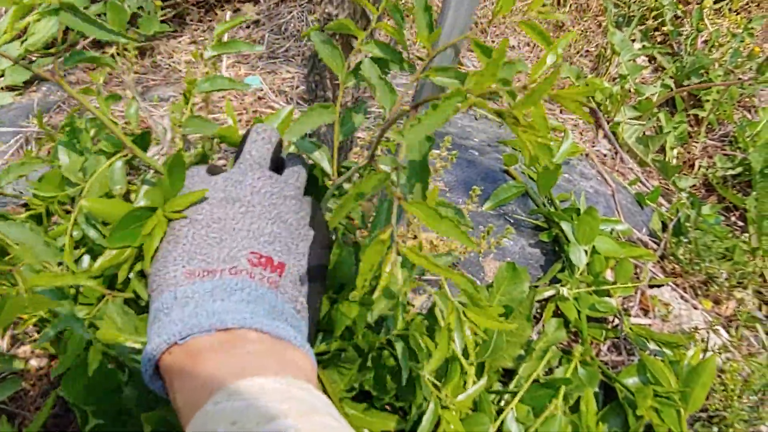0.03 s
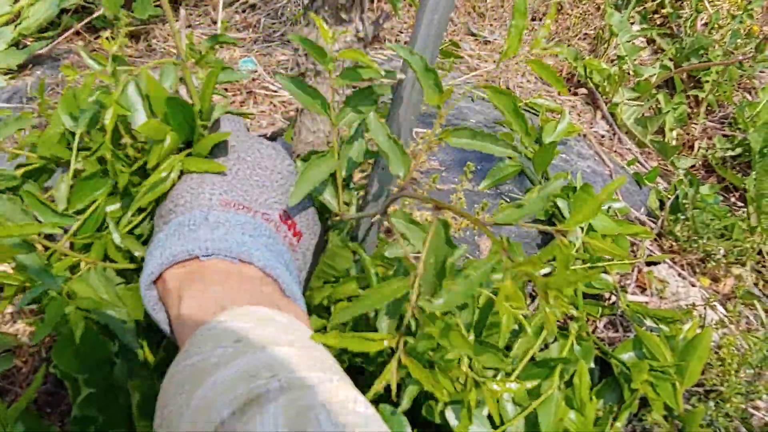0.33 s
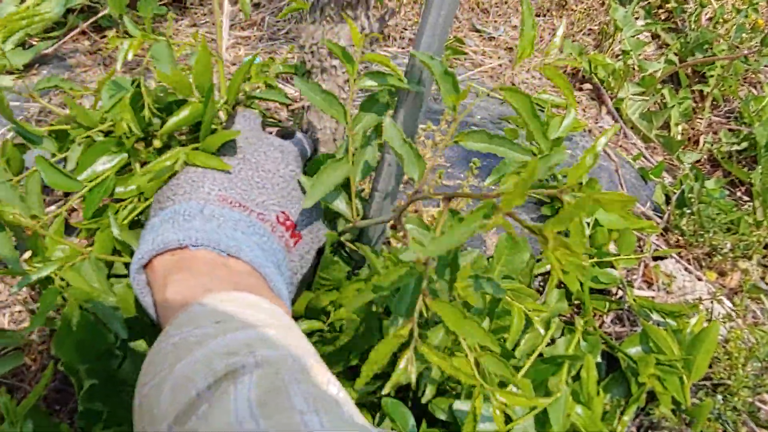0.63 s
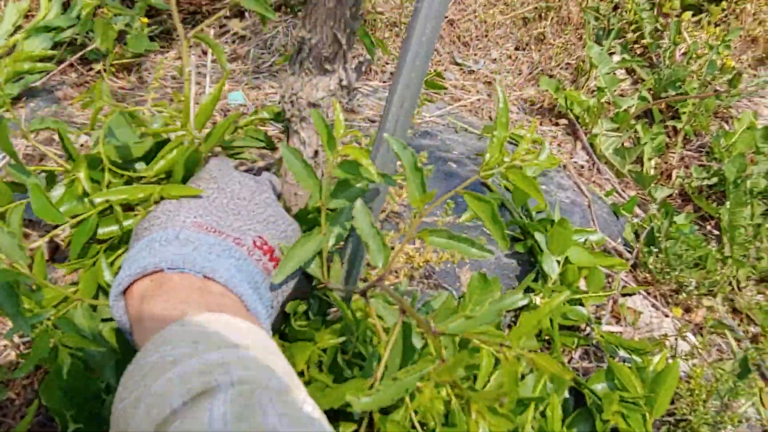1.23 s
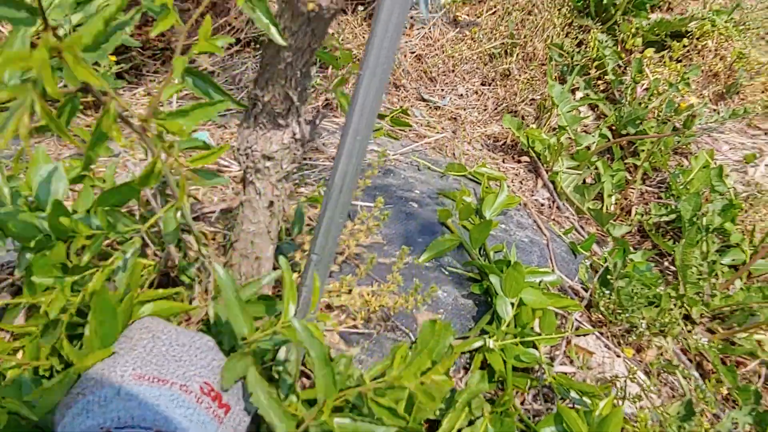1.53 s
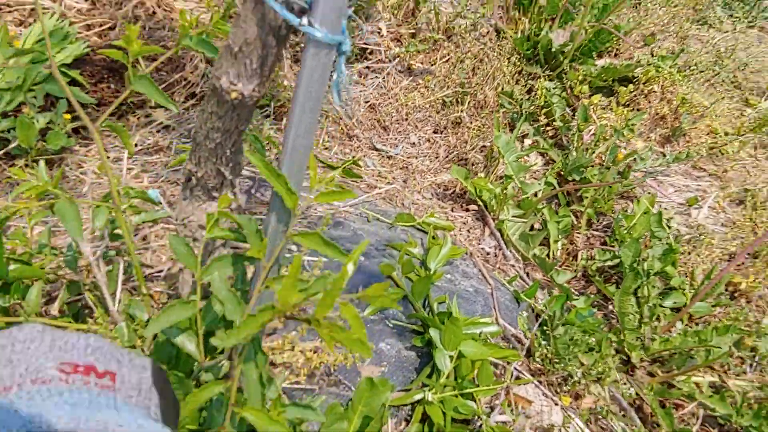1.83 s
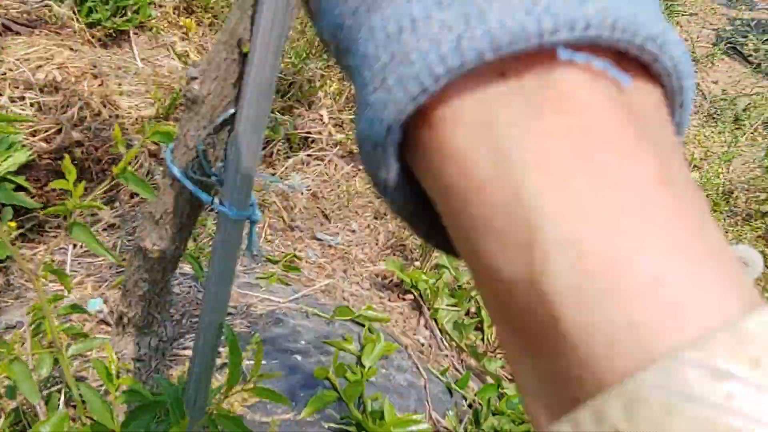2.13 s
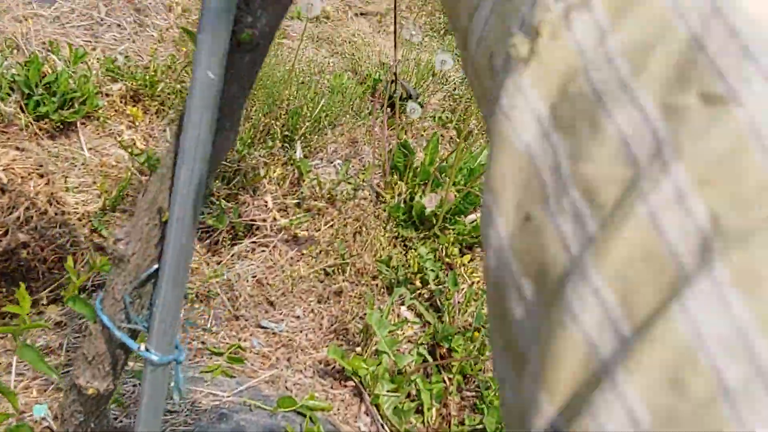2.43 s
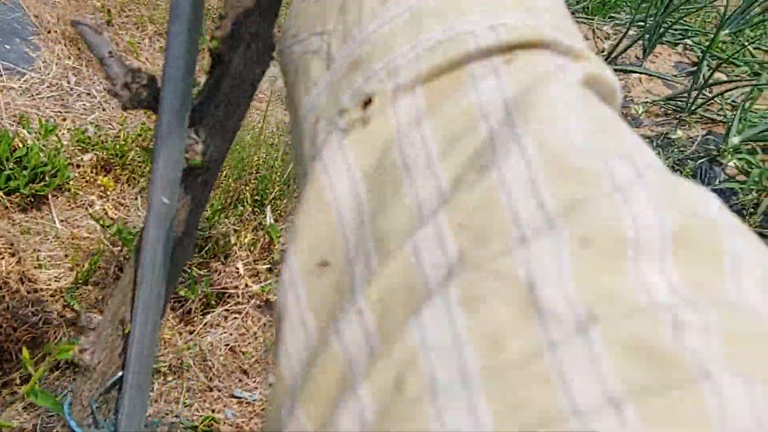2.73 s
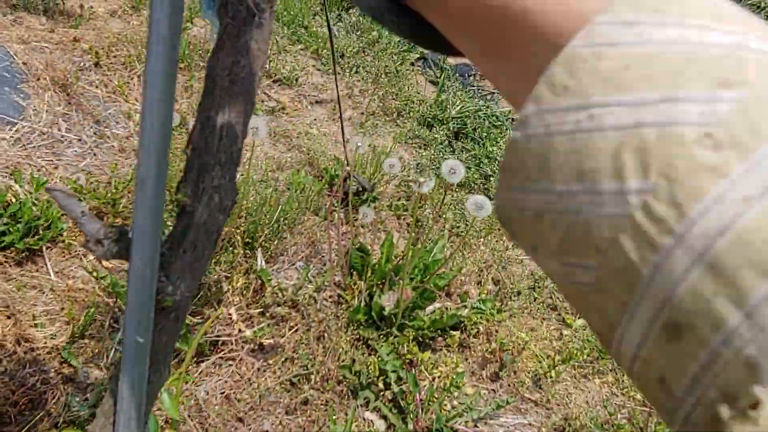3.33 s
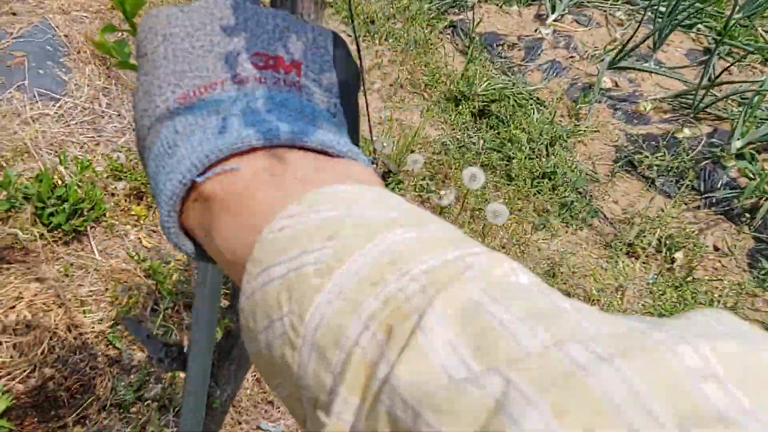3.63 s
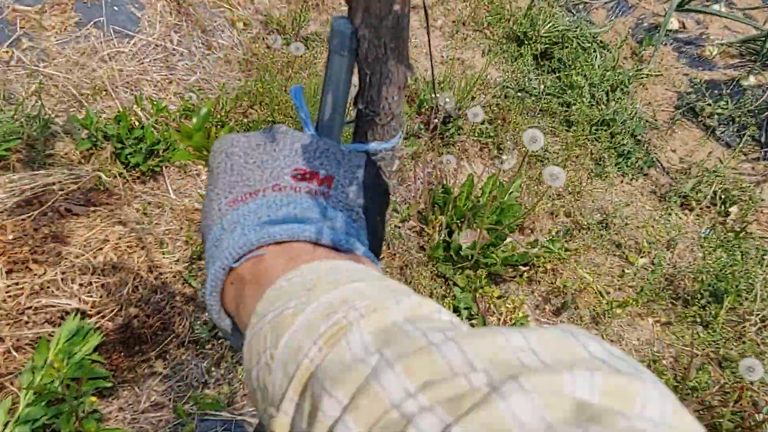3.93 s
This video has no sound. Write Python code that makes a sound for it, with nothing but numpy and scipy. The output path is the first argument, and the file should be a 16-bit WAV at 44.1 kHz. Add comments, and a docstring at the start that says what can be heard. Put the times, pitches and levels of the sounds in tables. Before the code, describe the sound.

Close snapping of young leafy shoots pulled from a small tree in a breezy garden.

```python
"""A gloved hand strips young shoots from a small tree, close to the microphone.
Leaves rustle from the start; a green stem cracks at 0.4 s. The glove rubs as it grips (1.2 s), bark
fibres tear, and stems crack in a cluster (1.6 s). More tears and cracks follow near 2.8 s, then a
thick shoot breaks with a hollow pop (3.5 s). Throughout, wind buffets the microphone over a quiet
garden with faint, distant birds."""
import sys
import numpy as np
from scipy import signal
from scipy.fft import rfft, irfft
from scipy.io import wavfile

SR = 44100
rng = np.random.default_rng(int(sys.argv[2]) if len(sys.argv) > 2 else 0)


def file_out(sig):
    """Save sig as 16-bit WAV at sys.argv[1]."""
    # one column per channel
    cols = np.atleast_2d(sig).T
    # limit, then scale
    lim = np.clip(cols, -1, 1)
    pcm = np.round(lim * 32767).astype(np.int16)
    wavfile.write(sys.argv[1], SR, pcm)


N = 176400
TIME_S = np.arange(N) / SR
FREQ_HZ = np.fft.rfftfreq(N, 1 / SR)


def amp(db):
    """dB to gain."""
    return 10 ** (np.asarray(db) / 20)


def unit(x):
    """Scale to rms 1."""
    return x / np.sqrt(np.mean(x ** 2) + 1e-20)


def pan(db):
    """Stereo gains for a left-minus-right level."""
    return unit(amp(np.array([[db], [-db]]) / 2))


def add(mix, t_s, sound):
    """Mix a sound in at t_s."""
    part = mix[:, max(round(t_s * SR), 0):][:, :sound.shape[-1]]
    part += sound[..., :part.shape[1]]


def bin_gains(spectrum, size):
    """Spectrum table to FFT bin gains."""
    hz, db = np.transpose(spectrum)
    bins_hz = np.fft.rfftfreq(size, 1 / SR)
    return amp(np.interp(np.log(bins_hz + 1), np.log(hz), db))


def colour(noise, spectrum):
    """Shape noise to a spectrum, rms 1."""
    return unit(irfft(rfft(noise) * bin_gains(spectrum, N), N))


def high_pass(x, hz):
    """Remove the bass a small stem cannot radiate."""
    return signal.lfilter(*signal.butter(2, hz, "high", fs=SR), x)


def drift(hz):
    """Random motion up to about hz, rms 1."""
    return unit(irfft(rfft(rng.standard_normal(N)) / (1 + (FREQ_HZ / hz) ** 4), N))


def stereo_noise(correlation):
    """Two partly correlated white noises."""
    noise = rng.standard_normal((3, N))
    return np.sqrt(correlation) * noise[0] + np.sqrt(1 - correlation) * noise[1:]


def ring(hz, width_hz, delay_s=0):
    """Damped mode, gain 1 at resonance."""
    t = np.maximum(np.arange(2048) / SR - delay_s, 0)
    return 2 * np.pi * width_hz / SR * np.exp(-np.pi * width_hz * t) * np.sin(2 * np.pi * hz * t)


def spray(decay_s, size=2048):
    """Dying cloud of tiny impulses, energy 1 per channel."""
    t = np.arange(size) / SR
    cloud = rng.standard_normal((2, size)) * np.sqrt(t) * np.exp(-t / decay_s)
    return cloud / np.linalg.norm(cloud, axis=1, keepdims=True)


LEAD_SAMPLES = 256


def fracture(body, splinter_db):
    """First fibres go, then the break, then splinters and scatter off leaves and ground."""
    splinters = spray(decay_s=0.002)
    scatter = amp(-4.5) * spray(decay_s=0.0093)
    after = amp(splinter_db) * (splinters + scatter)
    after[:, 0] += 1  # the break
    first_fibres = amp(splinter_db - 4.5) * spray(decay_s=0.0002, size=LEAD_SAMPLES)[:, ::-1]
    return signal.fftconvolve(np.hstack([first_fibres, after]), body[None], axes=1)


def crack(hz, width_hz, edge_db, splinter_db):
    """A stem gives: short ring plus a crisp edge of bursting cells; thinner stem, less bass."""
    edge = amp(edge_db) * high_pass(spray(decay_s=0.00036)[0], hz=3660)
    body = high_pass(ring(hz, width_hz), hz / 2)
    return fracture(body + edge, splinter_db)


# Stem cracks: t/s, level/dB, f/Hz, width/Hz, edge/dB, pan/dB
CRACKS = [(.4320, 1, 2340, 1200, -13, 7), (0.432, -4, 4330, 800, -26, 13), (.4325, 1, 14100, 3000, -25, 9),
          (1.56414, 4.5, 1174, 500, -20, 1), (1.56733, 8.5, 2900, 1450, -24, 10),
          (1.5675, 4, 1240, 2550, -12, 10), (1.60803, 11, 2970, 760, -17, -6),
          (1.60893, 10.5, 2125, 430, -12, 13), (1.6087, 14, 9040, 1700, -17, 20),
          (1.60858, 7, 900, 700, -13, 5), (1.6376, -5, 4370, 1200, -18, -1),
          (1.6427, 7.5, 2100, 600, -11, 11), (1.6424, 7, 4350, 900, -16, 30),
          (2.8082, -3.5, 4680, 1900, -9, -2), (2.8086, 3, 2220, 1060, -6, 12),
          (2.8101, 6.5, 1620, 380, -15, 5), (2.885, -9.5, 2930, 1900, 3.5, 5.5)]
# Leaf and twig flicks: t/s, level/dB, f/Hz
FLICKS = [(0.2057, -14.5, 3680), (0.334, -16, 2900), (0.362, -16.5, 2400), (0.7394, -11, 3370),
          (0.8128, -13, 5200), (.8594, -14.5, 2650), (.8880, -14.5, 2840), (1.0422, -17.5, 3350),
          (1.4761, -8, 1730), (2.7357, -14.5, 4030), (2.839, -18, 2700), (3.0458, -19.5, 2600),
          (3.089, -15, 2100), (3.343, -13.5, 4440), (3.3781, -11.5, 4400), (3.4777, -3.5, 1490),
          (3.4862, -6, 3270), (3.9587, -13.5, 4060)]


def stems():
    """Green stems crack; leaves and twigs flick."""
    out, lead_s = np.zeros((2, N)), LEAD_SAMPLES / SR
    for t_s, db, hz, width_hz, edge_db, pan_db in CRACKS:
        snap = crack(hz, width_hz, edge_db, splinter_db=-7.5)
        add(out, t_s - lead_s, amp(db) * pan(pan_db) * snap)
    for t_s, db, hz in FLICKS:
        flick = crack(hz, width_hz=1940, edge_db=-14.5, splinter_db=-4.5)
        add(out, t_s - lead_s, amp(db) * pan(db=7.4) * flick)
    return out


# Pop of the thick shoot, then its faint, quick echo off hand or ground: t/s, level/dB
POP_AND_ECHO = [(3.5237, 0.5), (3.5277, -20)]
# Shoot modes: f/Hz, width/Hz, level/dB, delay/s
SHOOT_MODES = [(670, 145, 20.5, 0.00022), (893, 330, 16, 0.00023), (1272, 226, 19, 0.00066),
               (2935, 600, 12.5, 0.00062), (4460, 900, 6.5, 0.00091), (6900, 1000, -2, 0.0009)]


def thick_shoot():
    """Hollow pop and its echo; bright modes start later as the break runs through."""
    modes = sum(amp(db) * ring(hz, width_hz, delay_s) for hz, width_hz, db, delay_s in SHOOT_MODES)
    body = high_pass(modes, hz=500)
    out = np.zeros((2, N))
    for t_s, db in POP_AND_ECHO:
        add(out, t_s - LEAD_SAMPLES / SR, amp(db) * pan(db=5) * fracture(body, splinter_db=-15))
    return out


def crackle(rate_hz, spread_db, impact_share):
    """Tiny impacts of uneven size over a smooth scrape."""
    sizes = amp(spread_db * np.minimum(rng.exponential(1, N), 5))
    hits = rng.random(N) < rate_hz / SR
    impacts = unit(sizes * hits * np.sign(stereo_noise(correlation=0.85)))
    scrape = stereo_noise(correlation=0.12)
    return np.sqrt(impact_share) * impacts + np.sqrt(1 - impact_share) * scrape


# Bark tears: t/s, length/s, level/dB, pan/dB
TEARS = [(1.406, 0.02, -39.5, 0), (2.732, 0.014, -40, 12), (2.8367, .016, -40, 2), (2.865, 0.033, -41, 8),
         (3.474, 0.026, -35.5, 7), (3.5016, 0.012, -29.5, 11)]
# Fibre spectrum: f/Hz, level/dB
FIBRE_SPECTRUM = [(100, -15), (500, -0.5), (1300, -3), (3300, -2), (9000, -5.5), (15000, -19)]


def tearing():
    """Runs of bark fibres part, starting abruptly and thinning out."""
    fibres = colour(crackle(rate_hz=1800, spread_db=4, impact_share=0.67), FIBRE_SPECTRUM)
    out = np.zeros((2, N))
    for t_s, length_s, db, pan_db in TEARS:
        progress = np.clip((TIME_S - t_s) / length_s, 0, 1)
        envelope = np.minimum(progress / 0.11, 1) * (1 - progress) ** 0.49
        out += amp(db) * pan(pan_db) * envelope * fibres
    return out


# Hand strokes through foliage: peak t/s, rise/s, fall/s, level/dB, tilt/(dB/octave), pan/dB
STROKES = [(.01, 0.074, 0.042, -47, 0.5, 9.5), (.30, 0.18, 0.11, -47.5, 0, 8),
           (.70, 0.42, 0.33, -52, 0.5, 7.5), (1.413, 0.031, 0.15, -42.5, 0.5, 9),
           (1.61, 0.13, 0.05, -37, 3, 9), (1.72, 0.16, 0.25, -42, 6.5, 12.5),
           (2.09, 0.02, 0.011, -44.5, 2, 13), (2.212, 0.028, 0.014, -46, 0.5, 7.5),
           (2.72, 0.18, 1, -58, 0, 5.5), (3.088, 0.0052, 0.012, -45.5, -4, 3),
           (3.529, 0.034, 0.058, -44.5, 2, 9.5), (3.65, 0.26, 0.14, -55, 0.5, 15),
           (3.99, 0.084, .05, -51.5, 1, 8.5)]
# Leaf spectrum: f/Hz, level/dB
LEAF_SPECTRUM = [(60, -38), (300, -4.5), (700, 0.5), (1250, 4), (3500, 0.5), (6000, -0.5), (9000, -6),
                 (15000, -10)]


def rustle():
    """Leaves slide over the glove and each other, swelling and fading with each stroke."""
    spectrum = rfft(colour(crackle(rate_hz=1800, spread_db=2.7, impact_share=0.7), LEAF_SPECTRUM))
    octaves = np.log2(np.clip(FREQ_HZ, 500, 7000) / 3000)
    out = np.zeros((2, N))
    for t_s, rise_s, fall_s, db, db_per_octave, pan_db in STROKES:
        swell = np.exp(np.minimum((TIME_S - t_s) / rise_s, (t_s - TIME_S) / fall_s))
        leaves = unit(irfft(spectrum * amp(db_per_octave * octaves), N))
        out += amp(db) * pan(pan_db) * swell * np.roll(leaves, rng.integers(N), axis=1)
    flicker_db = 2.43 * drift(hz=45)
    return out * amp(flicker_db)


# Glove rub while gripping: t/s, level/dB
GRIP = [(1.15, -71), (1.22, -54), (1.36, -55.5), (1.42, -74)]
# Hand and branch knocks: t/s, level/dB, f/Hz
KNOCKS = [(0.495, 4, 308), (0.577, 2.5, 305), (0.722, 8.5, 283), (.795, 1, 284), (1.607, 9, 270),
          (2.942, 6.5, 252), (3.5238, 17.5, 266)]


def hand():
    """Low rub of the glove on the branch, and dull knocks."""
    rub = unit(signal.fftconvolve(rng.standard_normal(N), ring(hz=513, width_hz=94))[:N])
    grip_db = np.interp(TIME_S, *np.transpose(GRIP))
    out = np.tile(rub * amp(grip_db), (2, 1))
    for t_s, db, hz in KNOCKS:
        add(out, t_s, amp(db) * ring(hz, width_hz=90))
    return out


# Wind strength: t/s, relative level/dB
WIND_LEVEL = [(0, -38), (.2, -42.5), (.62, -44), (.72, -38), (.92, -36), (1.12, -40.5), (1.3, -33.5),
              (1.5, -40.5), (1.9, -40), (2.68, -40), (2.78, -48), (3.1, -44.5), (3.22, -35.5), (4, -37)]
# Side the wind strikes: t/s, pan/dB
WIND_PAN = [(0, -4), (.5, 4), (1.3, -18), (1.75, 3.5), (2.6, 0.5), (3.3, 2.5), (3.9, -11)]
# Turbulence spectrum: f/Hz, level/dB
WIND_SPECTRUM = [(12, -6), (27, -8), (55, 1.5), (100, -4), (150, -12), (220, -22.5), (330, -34.5),
                 (2000, -89)]
# Eddies striking a port: t/s, level/dB, f/Hz, pan/dB
EDDIES = [(0.032, -20.5, 66.6, -17), (.725, -21, 125, -24), (1.357, -24, 99.6, -36), (3.447, -21, 68, 8),
          (3.682, -23.5, 133, -14), (3.72, -18.5, 87.6, -21), (3.813, -20.5, 79, -23),
          (3.88, -18.5, 90, -40)]


def wind():
    """Lumpy turbulence, separate at each microphone port, plus single stronger eddies."""
    pan_db = np.interp(TIME_S, *np.transpose(WIND_PAN))
    sides = amp(np.array([pan_db, -pan_db]) / 2)
    sides /= np.sqrt(np.mean(sides ** 2, axis=0))
    lumps_db = 2.34 * np.array([drift(hz=20), drift(hz=22.7)])
    rumble = colour(rng.standard_normal((2, N)) * amp(lumps_db), WIND_SPECTRUM)
    level_db = 4 + np.interp(TIME_S, *np.transpose(WIND_LEVEL))
    out = amp(level_db) * sides * rumble
    for t_s, db, hz, pan_db in EDDIES:
        cycles = (TIME_S - t_s) * hz
        pulse = np.sin(2 * np.pi * cycles) * np.exp(-(cycles / 0.5) ** 2)
        out -= amp(db) * pan(pan_db) * pulse
    return out


# Distant bird notes: t/s, length/s, f/Hz, level/dB
CHIRPS = [(0, 0.022, 4250, -51), (0.07, 0.03, 4260, -54.5), (.595, .033, 4240, -56.5),
          (1.135, 0.019, 4260, -54), (1.163, 0.025, 3340, -60), (2.069, 0.035, 3770, -53),
          (2.625, 0.035, 4040, -54.5), (2.68, 0.03, 4060, -53), (3.194, 0.036, 4150, -56.5),
          (3.974, 0.032, 3820, -54)]


def birds(fall_hz=279, waver_hz=210):
    """Thin falling notes with a soft outdoor echo."""
    notes, waver = np.zeros((2, N)), drift(hz=200)
    for t_s, length_s, mid_hz, db in CHIRPS:
        progress = np.clip((TIME_S - t_s) / length_s, 0, 1)
        hz = mid_hz + fall_hz * (0.5 - progress) + waver_hz * waver
        envelope = 2 * np.sqrt(progress * (1 - progress))
        notes += amp(db) * envelope * np.sin(2 * np.pi * np.cumsum(hz) / SR)
    echo = signal.fftconvolve(notes, spray(decay_s=0.008, size=8192), axes=1)[:, :N]
    return notes + amp(2.5) * echo


# Garden hush spectrum: f/Hz, level/dB
GARDEN_SPECTRUM = [(30, 6.5), (200, 8.5), (450, 1), (930, 3), (1300, -0.5), (2000, -12), (3000, -11),
                   (4300, -9), (6000, -21.5), (15000, -26.5)]


def garden():
    """Steady far-off outdoor hush."""
    level_db = -50.5 + 0.28 * drift(hz=11)
    return amp(level_db) * colour(stereo_noise(correlation=0.19), GARDEN_SPECTRUM)


def scene():
    """Sum of all sources at the microphone."""
    return stems() + thick_shoot() + tearing() + rustle() + hand() + wind() + birds() + garden()


# Left microphone port response: f/Hz, level/dB
LEFT_PORT = [(1000, 1.5), (3500, 2.5), (5500, -1.5), (6400, -4), (7300, -13.5), (8400, -20), (9600, -11),
             (10500, -13), (11400, -6), (13000, -16.5), (15000, -34)]
# Right microphone port response: f/Hz, level/dB
RIGHT_PORT = [(950, 1.5), (1250, -5.5), (1900, 9), (2700, 4), (6100, 0), (7000, 11.5), (7800, -5),
              (8500, -18), (9500, -28), (11200, -6), (15000, -17.5)]


def record(dry, ceiling=0.9, cutoff_hz=15900):
    """Minimum-phase colour per port, soft clipping, band limit."""
    channels = []
    for sound, port in zip(dry, (LEFT_PORT, RIGHT_PORT)):
        log_gain = np.log(bin_gains(port, size=2048))
        mirrored = np.r_[log_gain, log_gain[-2:0:-1]]
        response = np.exp(np.conj(signal.hilbert(mirrored)))
        taps = np.fft.ifft(response).real[:len(log_gain)]
        channels.append(signal.oaconvolve(sound, taps)[:N])
    clipped = ceiling * np.tanh(np.array(channels) / ceiling)
    low_pass = signal.firwin(255, cutoff_hz, window=("kaiser", 9), fs=SR)
    return signal.oaconvolve(clipped, low_pass[None], "same", axes=1)


dry = scene()
out = record(dry)
file_out(out)
```